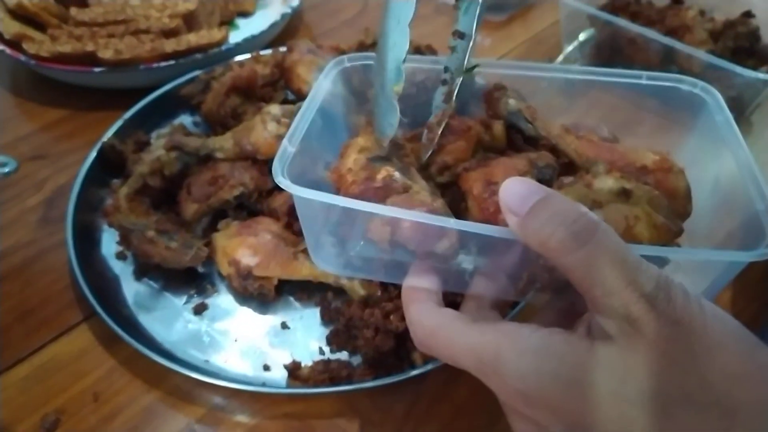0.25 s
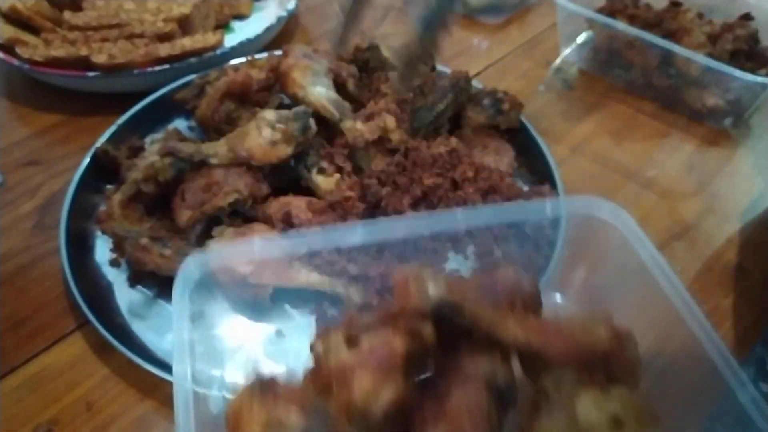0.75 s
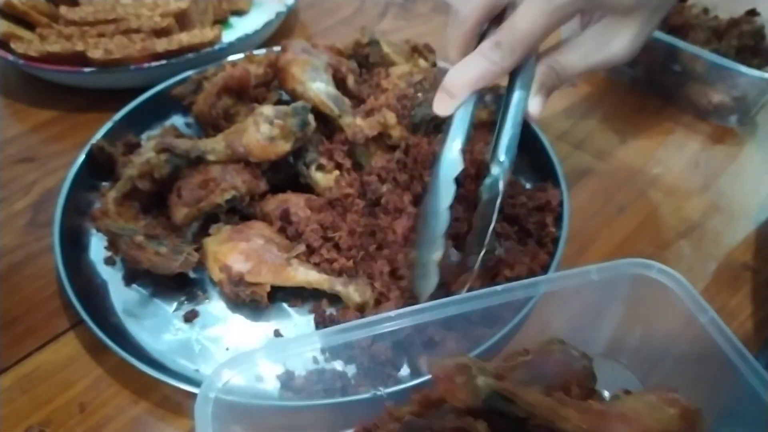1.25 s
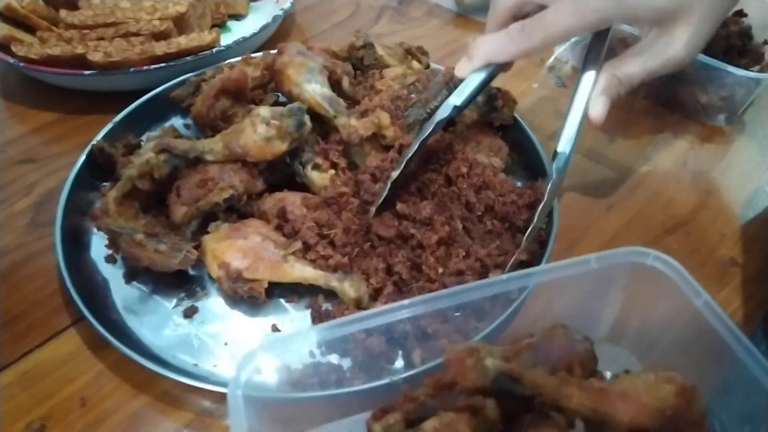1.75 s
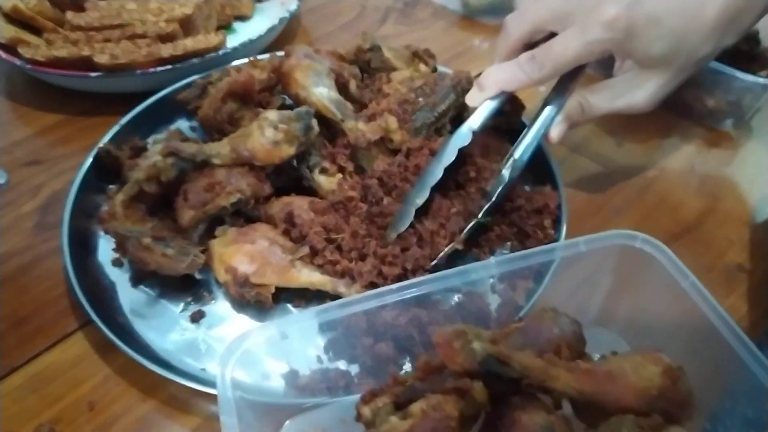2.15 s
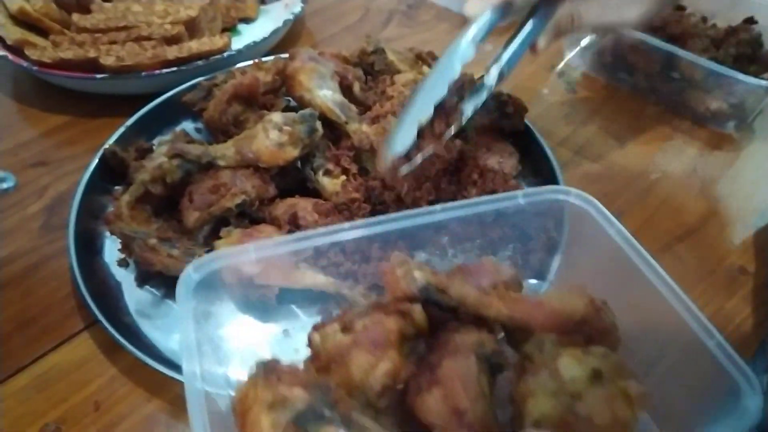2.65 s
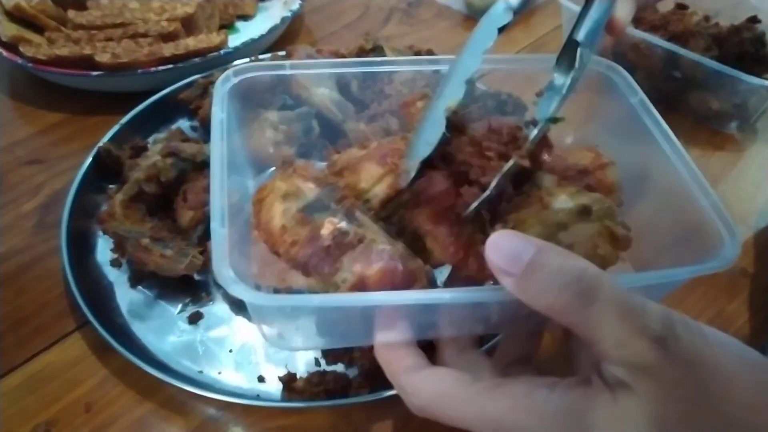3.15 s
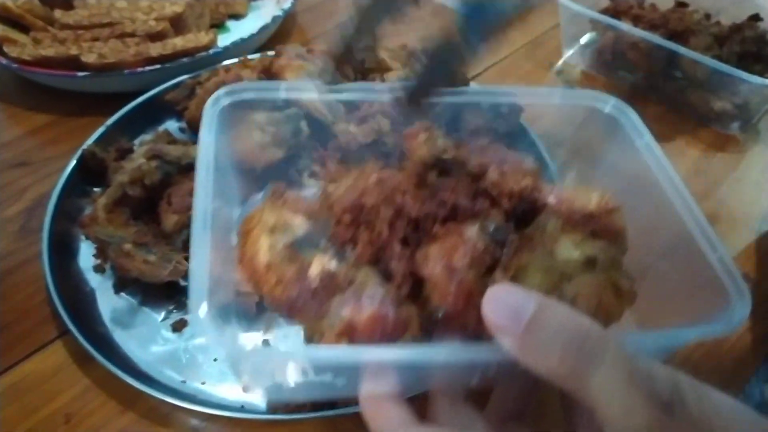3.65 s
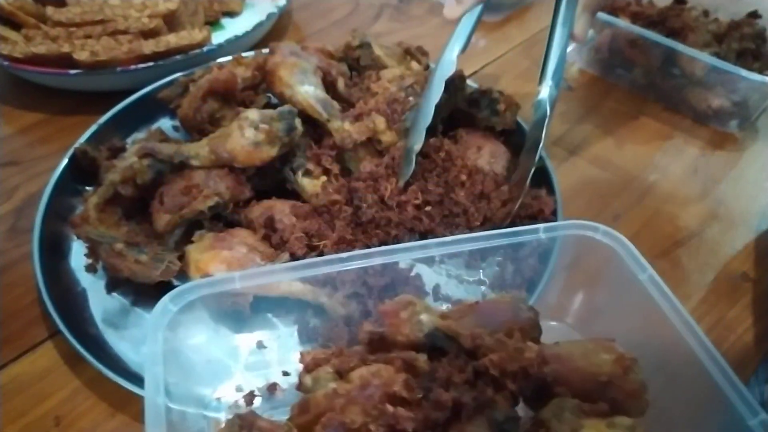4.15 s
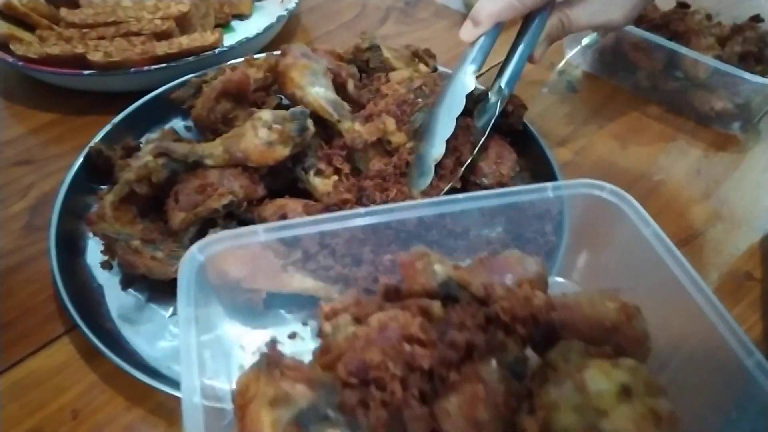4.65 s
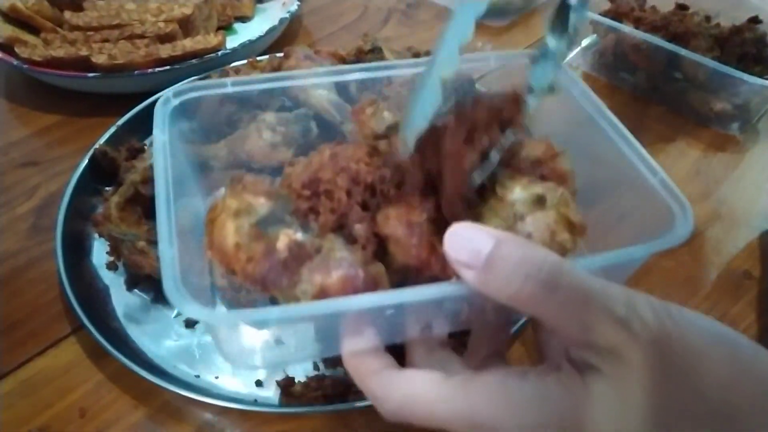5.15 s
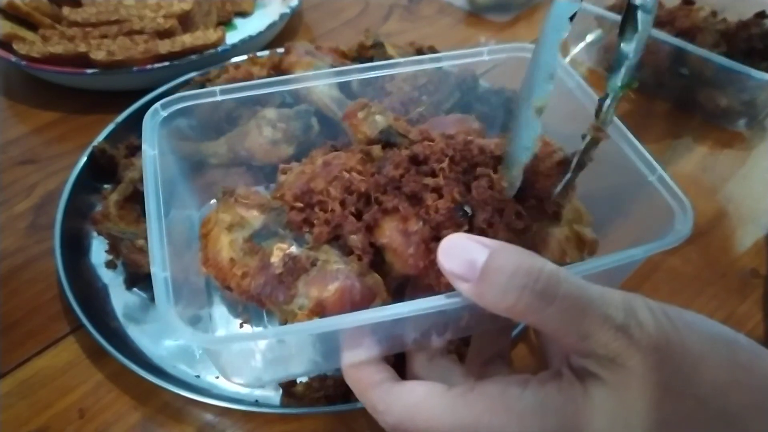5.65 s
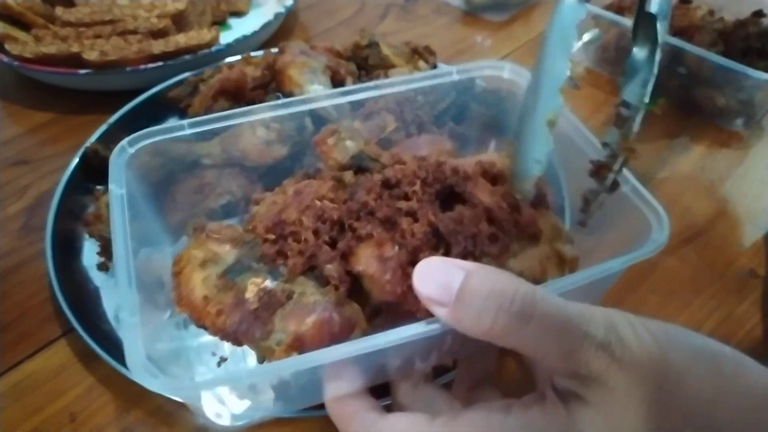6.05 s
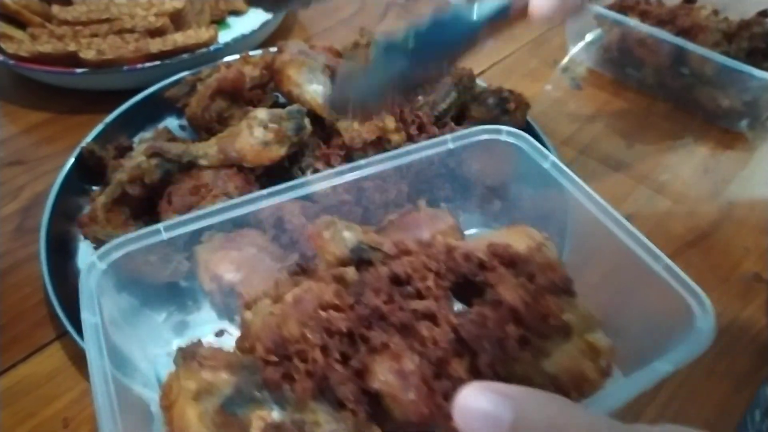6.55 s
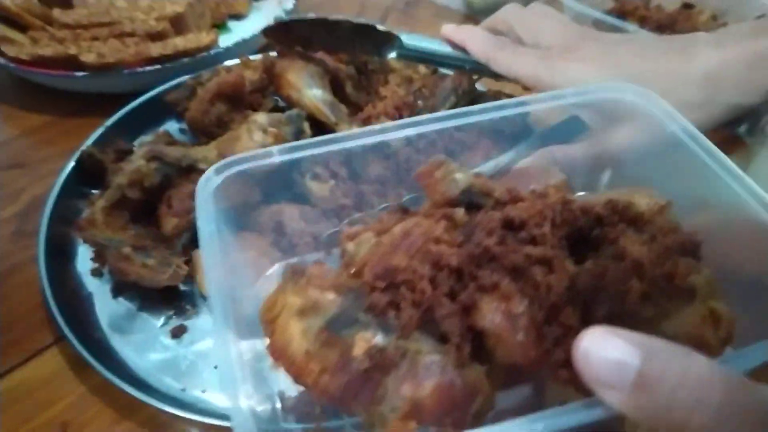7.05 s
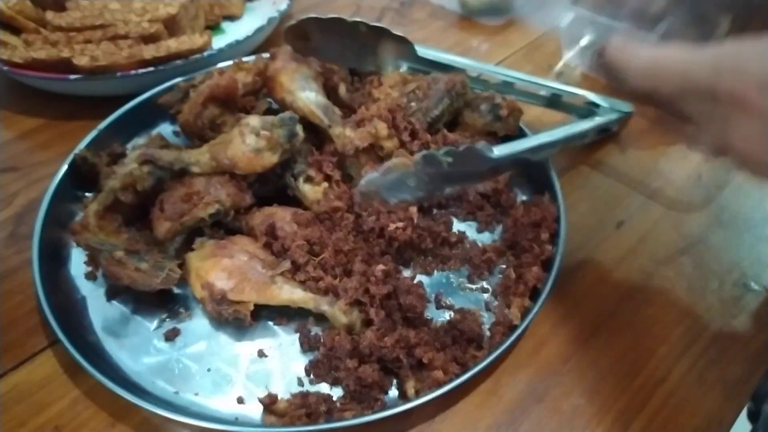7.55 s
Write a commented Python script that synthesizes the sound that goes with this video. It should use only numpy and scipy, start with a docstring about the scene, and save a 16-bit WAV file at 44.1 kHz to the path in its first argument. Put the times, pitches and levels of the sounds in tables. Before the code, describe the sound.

Steel tongs work dry, crunchy fried crumbs on a metal tray, very near the microphones. Scraping strokes alternate with clusters of small hollow plastic taps and bright steel ticks as crumbs are dropped into a box. Near the end come tight metallic clicks, a ringing clank of tongs set down, then a woody thud with a short crumbly scuff. Soft room air, hiss and a thin appliance whine sit behind.

```python
"""Tongs, crumbs and a plastic box

Place: a quiet tiled kitchen with its air, a thin whine and microphone hiss; faint gliding tones pass behind.
Close to the two microphones, steel tongs rake fried crumbs across a tray (grainy noise), knock them off against
a thin plastic box and are laid down; the box lands on a wooden table. Blows are coloured noise bursts with a
room answer, and the harder ones also leave decaying modes.
"""
import sys
import numpy as np
from scipy import signal
from scipy.fft import rfft, irfft, next_fast_len
from scipy.io import wavfile
from scipy.ndimage import uniform_filter1d, map_coordinates

SR = 44100
rng = np.random.default_rng(int(sys.argv[2]) if len(sys.argv) > 2 else 0)


def wav_record(signal):
    """Record a signal, one row per channel, as 16-bit PCM in the file named by sys.argv[1]."""
    frames = np.transpose(np.atleast_2d(signal))
    bounded = np.clip(frames, -1, 1)
    # unit amplitude maps onto the largest positive 16-bit level
    quanta = np.round(bounded * 32767).astype(np.int16)
    wavfile.write(sys.argv[1], SR, quanta)


N = 343980  # samples


def amp(db):
    """Decibels to a linear factor."""
    return np.exp(np.asarray(db) * np.log(10) / 20)


def unit(x):
    """x scaled to rms 1."""
    return x / np.sqrt(np.mean(x ** 2) + 1e-20)


def along(points, hz):
    """Values between (Hz, value) points, on a log frequency axis."""
    f, v = np.transpose(points)
    return np.interp(np.log(hz + 1), np.log(f + 1), v)


def wobble(rate):
    """A smooth random curve, rate knots a second."""
    knots = rng.standard_normal(int(N * rate / SR) + 4)
    return map_coordinates(knots, [np.arange(N) * rate / SR])


def filtered(x, response):
    """x shaped by a complex response of frequency."""
    n = x.shape[-1]
    m = next_fast_len(n + 1024)
    return irfft(rfft(x, m) * response(np.fft.rfftfreq(m, 1 / SR)), m)[..., :n]


def band(f, centre, width):
    """Causal resonance of one damped mode, 1 at its centre."""
    return 1j * f * width / (centre * centre - f * f + 1j * f * width)


# How alike steady noise is at the two microphones: (frequency [Hz], left-right correlation)
LIKENESS = [(60, 0.44), (130, 0.9), (290, 0.71), (640, 0.35), (1410, -0.065), (3100, 0.0065),
            (6820, -0.025), (15000, -0.11)]


def rush(spectrum, grains, size_db, patchy_db, grain_s=.001):
    """Stereo noise of rms 1: random patches of gain, and grains (per second) that stand out of it."""
    z = signal.stft(rng.standard_normal((2, N)), nperseg=512)[2]
    field = uniform_filter1d(rng.standard_normal(z.shape[1:]), 6, 0)
    field = uniform_filter1d(field, 10, 1)
    pair = signal.istft(z * amp(patchy_db * unit(field)), nperseg=512)[1][:, :N]

    sizes = amp(size_db * np.minimum(rng.exponential(size=N), 2))
    starts = (rng.random(N) < grains / SR) * sizes
    decay = np.exp(-1 / (grain_s * SR))
    pair = pair * (1 + signal.lfilter([1], [1, -decay], starts))

    def mid_side(hz):
        turn = np.arccos(np.clip(along(LIKENESS, hz), -1, 1)) / 2
        return amp(along(spectrum, hz)) * [np.cos(turn), np.sin(turn)]

    mid, side = filtered(pair, mid_side)
    return unit(np.array([mid + side, mid - side]))


# Kitchen air, relative spectrum: (frequency [Hz], density [dB per Hz])
AIR_SPECTRUM = [(12, -1.5), (25, -4.5), (55, -6.5), (128, -13.5), (166, -10), (298, -13), (332, -19),
                (370, -20), (490, -21.5), (723, -20.5), (1380, -28.5), (2320, -26), (3500, -35),
                (4550, -86), (7700, -120)]
# Microphone hiss lifted by the port resonance, relative spectrum: (frequency [Hz], density [dB per Hz])
HISS_SPECTRUM = [(2500, -22.5), (3500, -12.5), (7000, -14), (7700, -16), (8300, -2.5), (9200, -1.5),
                 (10300, -10), (11500, -19), (14000, -23), (16300, -33)]
# Whine of an appliance: (frequency [Hz], level before its flicker [dB])
WHINE_TONES = [(1930, -87), (2275, -77.5)]
AIR_DB, HISS_DB = -59, -63.5


def kitchen():
    """Noise of room air and microphone, with sine tones whose phase drifts and level flickers."""
    t = np.arange(N) / SR
    drift = .35 * wobble(10)  # rad
    flicker_db = 2.2 * wobble(9)
    whine = np.zeros((2, N))
    for hz, db in WHINE_TONES:
        phase = 2 * np.pi * hz * t + drift + [[0], [1.4]]  # left, right
        whine += np.sqrt(2) * amp(db + flicker_db) * np.sin(phase)
    air = amp(AIR_DB) * rush(AIR_SPECTRUM, 0, 0, patchy_db=1.45)
    hiss = amp(HISS_DB) * rush(HISS_SPECTRUM, 0, 0, patchy_db=2.5)
    return air + hiss + whine


# Raking strokes, one list each: (time [s], crunch of the crust [dB], pressure on the tray [dB])
STROKES = [
    [(1.25, -62, -65), (1.27, -58.5, -62), (1.33, -47.5, -58), (1.39, -48, -49), (1.43, -50, -60),
     (1.48, -52, -71), (1.52, -65, -74), (1.72, -75, -80)],
    [(1.74, -57.5, -68), (1.82, -55.5, -62), (1.95, -52.5, -57.5), (2.09, -53, -57), (2.36, -50, -60.5),
     (2.44, -49, -58.5), (2.52, -57.5, -73), (2.62, -65, -75), (2.76, -84, -85)],
    [(4.1, -58, -83), (4.19, -56, -65.5), (4.26, -51, -59.5), (4.32, -48.5, -51), (4.36, -53.5, -57),
     (4.4, -49.5, -55.5), (4.47, -52.5, -60.5), (4.65, -51, -66), (4.8, -52, -69), (4.88, -71, -70)],
]
# Crumbs sliding, short scuffs, and the noisy tail after a clank:
# (start [s], length [s], crunch [dB], patter [dB])
SLIDES_AND_SCUFFS = [(0, 0.11, -57, -42), (.13, 0.051, -73, -59), (0.23, 0.088, -59, -55),
                     (0, 0.46, -56, -52.5), (2.391, 0.027, -45, -55), (2.497, 0.02, -48.5, -57),
                     (3.056, 0.79, -55.5, -65.5), (3.61, 0.5, -63, -59.5), (5.22, 0.3, -58, -79),
                     (5.593, .24, -50.5, -62), (5.906, 0.98, -63.5, -63.5), (6.693, 0.4, -58, -87),
                     (7.114, 0.26, -51, -53.5), (7.195, 0.94, -67.5, -65), (7.544, 0.069, -42, -48),
                     (7.602, 0.26, -47, -53), (7.667, 0.18, -60, -53)]
# Relative spectra of breaking crust, falling crumbs and droning tray: (frequency [Hz], density [dB per Hz])
CRUST_SPECTRUM = [(2060, -19), (3500, -13), (5030, -14.5), (6600, -9), (7080, -12.5), (8320, -3.5),
                  (9910, -2), (14800, -18.5), (16100, -32), (16400, -48)]
PATTER_SPECTRUM = [(300, -33), (550, -10), (760, -13), (1300, -7.5), (1480, -9.5), (1660, -7), (3000, -10),
                   (3600, -17.5), (5850, -24), (9900, -120)]
DRONE_SPECTRUM = [(88, -19), (150, 5.5), (433, 0), (571, 5), (717, -0.5), (950, -1), (1060, 1.5), (1150, 6),
                  (1260, 1), (1540, -12), (1690, -1), (1850, -21), (2300, -65), (3520, -120)]
PATTER_DB, DRONE_DB = -4.5, -0.5  # over the pressure
RISE = 0.14  # share of a slide or scuff spent swelling, and dying
FADE_DB = 16  # loss per length, counted from the end of the swell


def crumbs():
    """Dense crackle of breaking crust, pattering slides and scuffs, and the tray droning under the tips."""
    t, gains = np.arange(N) / SR, np.zeros((3, N))
    for stroke in STROKES:
        s, crunch_db, pressure_db = np.transpose(stroke)
        levels = crunch_db, pressure_db + PATTER_DB, pressure_db + DRONE_DB
        gains += amp([np.interp(t, s, level, left=-150, right=-150) for level in levels])
    for s, length, *levels in SLIDES_AND_SCUFFS:
        u = (t - s) / length
        swell = np.clip(u / RISE, 0, 1)
        ending = np.clip((1 - u) / RISE, 0, 1)
        gains[:2] += amp(np.c_[levels] - FADE_DB * np.clip(u - RISE, 0, 1)) * swell * ending
    crunch, patter, drone = uniform_filter1d(gains, size=1300, axis=1)

    grip = amp(1.5 * wobble(22))  # uneven level shared by all three
    crust = rush(CRUST_SPECTRUM, 350, size_db=3.5, patchy_db=1.5, grain_s=.00025)
    bits = rush(PATTER_SPECTRUM, 110, size_db=4, patchy_db=1.5, grain_s=.0008)
    tray = rush(DRONE_SPECTRUM, 30, size_db=-10.0, patchy_db=1.0)
    return grip * (crunch * crust + patter * bits + drone * tray)


def blow(response, t60, alike, echo_db, echo_t60, rise_s=0.0012):
    """A burst of noise in the colour of the struck body, then the room's diffuse answer."""
    t = np.arange(SR // 3) / SR
    bins = rng.standard_normal((4, len(t) // 2 + 1, 2)) @ [1, 1j]
    noise = unit(irfft(bins * response(np.fft.rfftfreq(len(t), 1 / SR)), len(t)))
    turn = np.arccos(np.clip(alike, 0, 1)) / 2
    near, far = np.cos(turn) * noise[:2, None] + np.sin(turn) * noise[2:, None] * [[1], [-1]]
    snap = amp(-60 * t / t60) + 0.16 * amp(-60 * t / 0.0013)  # the first touch is the sharpest
    direct = near * snap * np.minimum(t / rise_s, 1)
    energy = np.sqrt(t60 / echo_t60)  # a longer contact feeds the room more
    echo = energy * far * amp(echo_db - 60 * t / echo_t60) * np.minimum(t / 0.0047, 1)
    return direct + echo


# Crack of steel, relative spectrum before its tilt: (frequency [Hz], density [dB per Hz])
CRACK_SPECTRUM = [(1940, -59), (3300, 3.5), (4040, 4.5), (6900, 1), (8280, 7.5), (10100, 6.5), (12200, -7),
                  (15100, -16), (16400, -41)]
STEEL_PAN_DB = 1.5  # left over right


def tick(db, t60, bright_db):
    """The crack of steel, noise tilted by bright_db per octave around 9 kHz, a little to the left."""
    def colour(f):
        return amp(along(CRACK_SPECTRUM, f) + bright_db * np.log2(f / 9000 + .01))

    crack = blow(colour, t60, 0.025, echo_db=-7, echo_t60=0.36)
    return amp(db - 6.0) * crack * amp(STEEL_PAN_DB * np.c_[[.5, -.5]])


# Resonances heard in a knock, of box and held tongs together:
# (frequency [Hz], width [Hz], strength before scatter [dB])
KNOCK_MODES = [(572, 130, 4.5), (860, 88, 3), (1042, 117, 5), (1300, 440, 1.5), (1790, 210, 3.5),
               (2014, 146, 2), (2262, 190, 3.5), (2837, 224, 3), (3720, 570, -0.5)]
SPOT_WIDTH = .8  # band of the struck spot, as a share of its pitch
SPOT_FLOOR = 0.29  # share of its pitch under which little sounds
CLEAN_DB = -4  # plain ring over the rattle


def knock(db, hz, t60):
    """Box and tongs ring most near the pitch of the struck spot, and rattle, a little to the right."""
    scatter = amp(1.5 * rng.standard_normal(len(KNOCK_MODES)))  # each mode at a new strength

    def spot(f):
        bodies = sum((-1) ** k * g * amp(mode_db) * band(f, centre, width)
                     for k, ((centre, width, mode_db), g) in enumerate(zip(KNOCK_MODES, scatter)))
        struck = bodies * band(f, hz, SPOT_WIDTH * hz)
        return struck / (1 + (f / 3600) ** 8) / (1 + (SPOT_FLOOR * hz / (f + 1)) ** 4)

    rattle = blow(spot, t60, 0.23, echo_db=-7, echo_t60=0.36)
    t = np.arange(rattle.shape[1]) / SR
    ring = irfft(spot(np.fft.rfftfreq(len(t), 1 / SR)), len(t)) * amp(-60 * t / 0.22)
    ring = ring / np.linalg.norm(ring) * np.sqrt(t60 * SR / np.log(1e6))  # energy of the decaying rattle
    return amp(db + 3.5) * (rattle + amp(CLEAN_DB) * ring) * amp([[-.8], [.8]])


# Low part of a blow, relative spectrum: (frequency [Hz], density [dB per Hz])
THUD_SPECTRUM = [(24, -49), (40, -1), (80, 8), (134, -13), (189, 8), (338, 5), (462, 6), (526, 3),
                 (581, 9.5), (740, 7.5), (1200, -11), (1560, -36), (2640, -120)]
THUD_LONGER_S = 0.015  # added to the decay time of the blow


def thud(db, t60):
    """The low, longer part of a blow, noise with a slower rise and a long room answer."""
    def colour(f):
        return amp(along(THUD_SPECTRUM, f))

    low = blow(colour, t60 + THUD_LONGER_S, 0.46, echo_db=-2.0, echo_t60=0.58, rise_s=0.0047)
    return amp(db - 13.0) * low


# Levels in these three are relative, before the trim of each sound.
# Heavier bumps on tray or table: (time [s], steel tick [dB], knock [dB], knock pitch [Hz], low thud [dB])
HEAVY_BUMPS = [(0, -33, -29, 1720, -22.5), (0.0626, -35, -49, 1890, -47), (1.3847, -53, -66, 1060, -29.5),
               (7.105, -13, -27, 2640, -47), (7.121, -20, -37, 2800, -21.5), (7.132, -21.5, -58, 1760, -29),
               (7.5537, -40, -39.5, 890, -24), (7.5725, -21, -50, 802, -18), (7.6044, -47, -68, 837, -23),
               (7.6547, -41, -67, 910, -29), (7.6913, -48, -52, 947, -26.5), (7.7129, -37, -54, 2810, -30),
               (7.7438, -34, -57, 923, -35), (7.7618, -34, -53, 2830, -39)]
# Tongs knocking the box: (time [s], steel tick [dB], box knock [dB], knock pitch [Hz])
BOX_KNOCKS = [(0.148, -54, -45, 1210), (0.171, -46, -51, 1840), (.207, -55, -56, 2000),
              (0.2484, -39, -55, 1940), (0.268, -34.5, -45.5, 1270), (0.124, -55, -51, 900),
              (.305, -57, -51, 1490), (0.355, -60, -53.5, 910), (0.3703, -63, -47, 1430),
              (0.46, -47, -50.5, 1500), (0.499, -55, -57.5, 2100), (3.24, -33.5, -33, 1150),
              (3.243, -50, -40.5, 650), (3.2477, -35, -38, 1080), (3.2552, -32.5, -59, 2000),
              (3.293, -30, -45.5, 1140), (3.297, -30, -42, 1290), (3.301, -50, -41, 620),
              (3.33, -37, -52, 700), (3.4271, -36, -45, 1720), (3.5036, -34, -46.5, 1050),
              (3.507, -23, -36.5, 1330), (3.521, -52, -39.5, 2390), (3.562, -33.5, -60, 2840),
              (3.6196, -31, -38, 1950), (3.639, -34, -49, 1740), (3.6563, -35, -51.5, 1650),
              (3.677, -30.5, -55, 2134), (3.683, -33, -49.5, 1900), (3.701, -33.5, -59, 1800),
              (3.7442, -70, -48.5, 1780), (3.762, -29, -39, 1740), (3.765, -48, -45, 780),
              (3.8565, -28.5, -53, 2040), (5.149, -40.5, -53, 1510), (5.134, -48, -60, 900),
              (5.169, -48, -50, 910), (5.1639, -38, -44.5, 1360), (5.173, -48, -54, 1500),
              (5.29, -26.5, -50, 1720), (5.3043, -49, -50, 1000), (5.318, -54, -55, 2200),
              (5.3505, -23.5, -50, 2290), (5.3555, -29.5, -37.5, 2360), (5.389, -50, -56, 2200),
              (5.4061, -30.5, -44.5, 2750), (5.4317, -28.5, -48, 2470), (5.441, -28, -45.5, 2900),
              (5.4558, -33.5, -52, 3180), (5.5847, -39, -49, 1980), (5.597, -33.5, -38, 1940),
              (5.685, -52, -52.5, 950), (5.713, -39, -50, 2320), (5.7255, -32, -43.5, 2040),
              (5.7385, -34, -44, 2430), (5.7475, -32.5, -44.5, 2210), (5.8173, -35.5, -46.5, 1980),
              (5.8388, -18.5, -30, 2120), (5.8476, -24, -39, 2420), (5.856, -50, -40.5, 1840),
              (5.878, -30, -49, 2320), (5.904, -26.5, -41.5, 1410), (5.918, -33, -55, 1570),
              (6.055, -57, -55, 1200), (6.117, -40, -50.5, 900), (6.1422, -18, -32.5, 1190),
              (6.1594, -31, -34, 1040), (6.175, -45, -48, 1400), (6.196, -47, -52, 1600),
              (6.3202, -43, -53, 1950), (6.3444, -30, -40, 1860), (6.3507, -30.5, -41, 2600),
              (6.4097, -34, -52.5, 3120)]
# Steel touching steel: (time [s], tick [dB])
STEEL_TICKS = [(.843, -35), (0.8782, -38.5), (1.2595, -37), (3.114, -42), (3.172, -36.5), (3.826, -33),
               (3.864, -41), (3.891, -39), (3.9234, -30.5), (4.065, -45), (4.7116, -40), (5.8007, -38),
               (6.514, -32), (6.551, -31.5), (6.6794, -34), (6.6945, -20), (6.698, -16), (6.7114, -35),
               (6.7395, -33), (6.744, -25), (6.7225, -35), (6.778, -33), (6.791, -29)]
TICK_T60_S, KNOCK_T60_S, BUMP_T60_S = 0.028, 0.025, 0.044
TICK_BRIGHT_DB, KNOCK_BRIGHT_DB, BUMP_BRIGHT_DB = 7.5, 1, 7.5  # tilt of the crack per octave
THUD_DB, THUD_DB_PER_OCTAVE = -16, 9.5  # thud setting at 1 kHz, over the knock's, and its rise with pitch


def contacts():
    """Heavier bumps on tray or table, knocks on the box, and steel ticks alone."""
    out, hits = np.zeros((2, N + SR)), []
    for s, tick_db, knock_db, hz, thud_db in HEAVY_BUMPS:
        steel = tick(tick_db, BUMP_T60_S, BUMP_BRIGHT_DB)
        hits.append((s, steel + knock(knock_db, hz, BUMP_T60_S) + thud(thud_db, BUMP_T60_S)))
    for s, tick_db, knock_db, hz in BOX_KNOCKS:
        thud_db = knock_db + THUD_DB + THUD_DB_PER_OCTAVE * np.log2(hz / 1000)
        steel = tick(tick_db, KNOCK_T60_S, KNOCK_BRIGHT_DB)
        hits.append((s, steel + knock(knock_db, hz, KNOCK_T60_S) + thud(thud_db, KNOCK_T60_S)))
    for s, db in STEEL_TICKS:
        hits.append((s, tick(db, TICK_T60_S, TICK_BRIGHT_DB)))
    for s, hit in hits:
        out[:, round(s * SR):][:, :hit.shape[1]] += hit
    return out[:, :N]


# Blows hard enough to leave a ring:
# (time [s], lower ring of the tongs [dB], upper ring of the tongs [dB], table [dB])
HARD_BLOWS = [(.001, -55, -46, -60), (5.836, -68, -54, -72), (6.143, -66, -70, -60.5),
              (6.697, -76, -58, -73), (6.712, -83, -53, -85), (6.741, -85, -53, -86), (6.79, -88, -68, -82),
              (7.1064, -43, -61, -44), (7.121, -59, -54, -49), (7.132, -56, -49, -50),
              (7.552, -80, -47.5, -34.5), (7.564, -85, -42, -46), (7.572, -83, -48, -49),
              (7.583, -81, -42, -62), (7.605, -85, -54, -47.5), (7.654, -77, -53, -51),
              (7.712, -78, -55, -55), (7.743, -71, -53, -60), (7.761, -72, -54, -58)]
# Knocks that reach the floor of the box: (time [s], level [dB])
FLOOR_BLOWS = [(6.143, -49), (6.1588, -48), (7.12, -60), (7.553, -53), (7.692, -61)]
# Lower ring of the tongs, laid on the tray; their upper ring; wooden table; box floor:
# (frequency [Hz], level before scatter [dB], t60 [s])
LOW_TONGS_MODES = [(1400, -9, .15), (1620, -3, .15), (1757, 2, .3), (1830, 3, .3), (1882, 1, .28),
                   (2210, -7, .35), (2340, -4, .3), (2727, 0, .25), (2800, 1, .3), (2855, -1, .7),
                   (2905, -1, .2), (3440, -8, .3), (4000, -4, .12), (4815, -9, .12), (8530, -3, .1)]
HIGH_TONGS_MODES = [(3994, -6, .08), (4409, -3, .07), (4830, -6, .08), (5566, -3, .07), (6670, 3, .09),
                    (7290, -6, .08), (8215, -2, .07), (8528, -3, .1), (9690, 0, .1), (10060, -3, .1),
                    (11820, -6, .08)]
TABLE_MODES = [(68, -9, .2), (101, -4, .26), (137, -8, .25), (163.3, -6, .3), (210, 0, .3), (250.4, -6, .3),
               (312, -7, .25), (347, -2, .4), (414, -6, .3), (463, -4, .14), (524, 4, .22), (630, -5, .25),
               (705, -3, .3), (753, -3, .16), (842, -2, .14), (925, 2, .1)]
FLOOR_MODES = [(930, -3, .2), (1035, 0, .42), (1180, -5, .2)]
RISE_CYCLES = 1.5  # a mode swells for this many cycles and 0.78 ms more


def rings():
    """Modes of the struck bodies, new in strength at each blow; loose contact makes their phase wander."""
    out, t = np.zeros((2, N + SR)), np.arange(SR * 2 // 5) / SR
    # modes, left-right phase spread [rad], clank while the contact lasts [dB over the mode], its t60 [s]
    low_tongs, high_tongs = (LOW_TONGS_MODES, .6, 15, .022), (HIGH_TONGS_MODES, 1.37, 0, .03)
    table, floor = (TABLE_MODES, 0.17, -3, .03), (FLOOR_MODES, .6, 0, .03)
    blows = [(s, db, floor) for s, db in FLOOR_BLOWS]
    for s, *levels in HARD_BLOWS:
        blows += [(s, db, body) for db, body in zip(levels, (low_tongs, high_tongs, table))]

    for s, level_db, (modes, spread, clank_db, clank_t60) in blows:
        for hz, db, t60 in modes:
            strength_db, phase, *lag = rng.standard_normal(4)
            step = np.sqrt((2 * hz + 1000) / 40 / SR)  # rad per sample
            wander = step * np.cumsum(rng.standard_normal(len(t)))
            swell = np.minimum(t / (0.00078 + RISE_CYCLES / hz), 1)
            ring = np.sin(2 * np.pi * (hz * t + phase) + wander + spread * np.c_[lag]) * swell
            decay = amp(-60 * t / t60) + amp(clank_db - 60 * t / clank_t60)
            level = amp(level_db + db + 1.5 * strength_db)
            out[:, round(s * SR):][:, :len(t)] += level * decay * ring
    return out[:, :N]


# Faint gliding tones, some perhaps the tray singing under the tongs:
# (start [s], length [s], first pitch [Hz], last pitch [Hz], level [dB], blur [knots per s])
FAINT_TONES = [(.73, .3, 740, 765, -68, 70), (1.43, .25, 700, 600, -63, 80), (2.0, .2, 1150, 1120, -66, 25),
               (2.15, .16, 1030, 1050, -67, 25), (2.47, .37, 1165, 1180, -70.5, 60),
               (4.78, .34, 700, 600, -62.5, 95), (5.43, .17, 620, 640, -63, 90)]


def gliding_tones():
    """Random swings of sine and cosine smear each gliding note into a fuzzy band."""
    t, out = np.arange(N) / SR, np.zeros((2, N))
    for s, length, first_hz, last_hz, db, blur in FAINT_TONES:
        u = np.clip((t - s) / length, 0, 1)
        phase = 2 * np.pi * np.cumsum(first_hz + (last_hz - first_hz) * u) / SR
        smear = [wobble(blur) * np.sin(phase) + wobble(blur) * np.cos(phase) for _ in out]
        out += amp(db) * np.sqrt(np.abs(np.sin(np.pi * u))) * smear
    return out


# Blows close by reach the two microphones unevenly: (frequency [Hz], left over right [dB])
CLOSE_TILT = [(1000, -0.5), (2000, -0.5), (4000, 0.5), (8000, -4.5), (13000, 5)]


def scene():
    """Kitchen air, crumbs and faint tones, with the close blows tilted between the microphones."""
    def closeness(hz):
        return amp(along(CLOSE_TILT, hz) * [[.5], [-.5]])

    blows = filtered(contacts() + rings(), closeness)
    return kitchen() + crumbs() + blows + gliding_tones()


# The two microphones differ: (frequency [Hz], left over right [dB])
MICROPHONE_TILT = [(60, -1.5), (180, -1), (550, 1), (1650, -0.5), (4970, -1), (15000, 4)]
TOP_HZ = 16500  # band limit


def record(dry):
    """The right microphone is duller near the very top; nothing passes the band limit."""
    def microphones(hz):
        return amp(along(MICROPHONE_TILT, hz) * [[.5], [-.5]]) * (hz < TOP_HZ)

    return filtered(dry, microphones)


dry = scene()
out = record(dry)
wav_record(out)
```